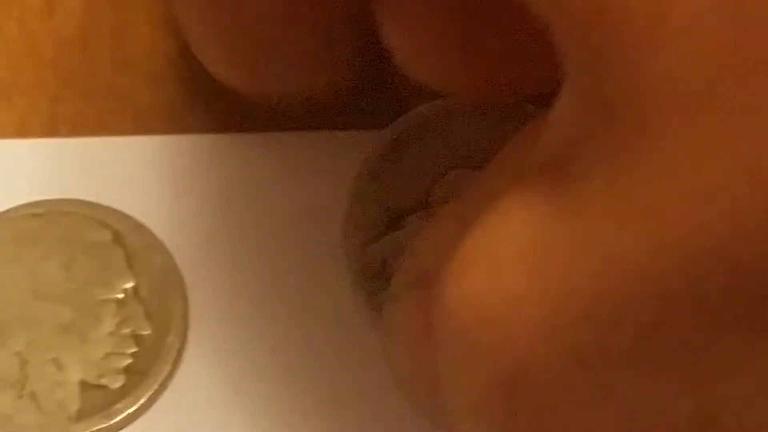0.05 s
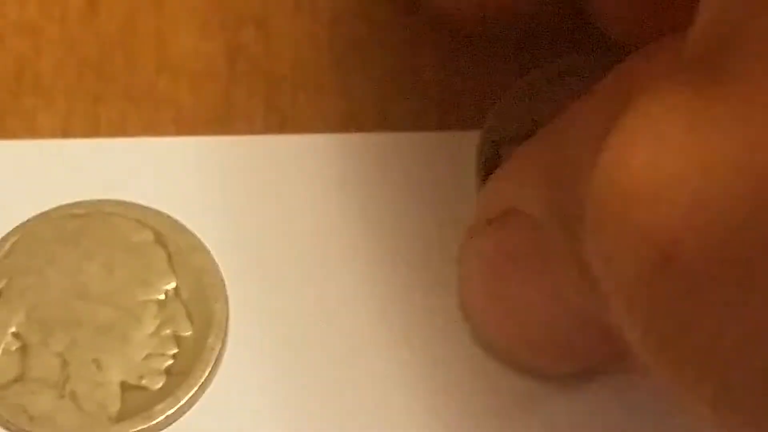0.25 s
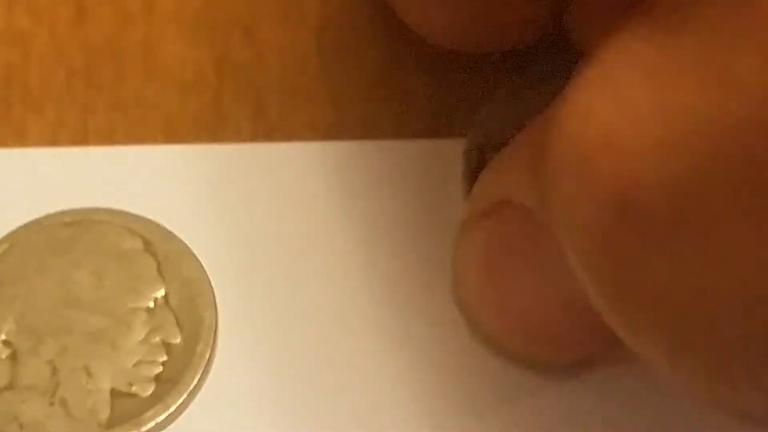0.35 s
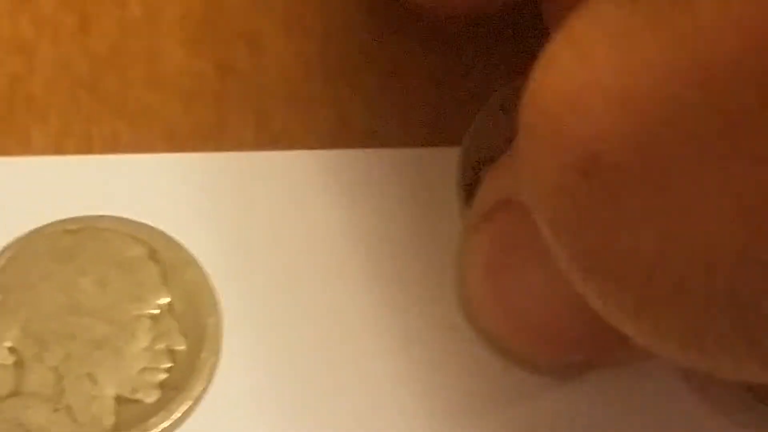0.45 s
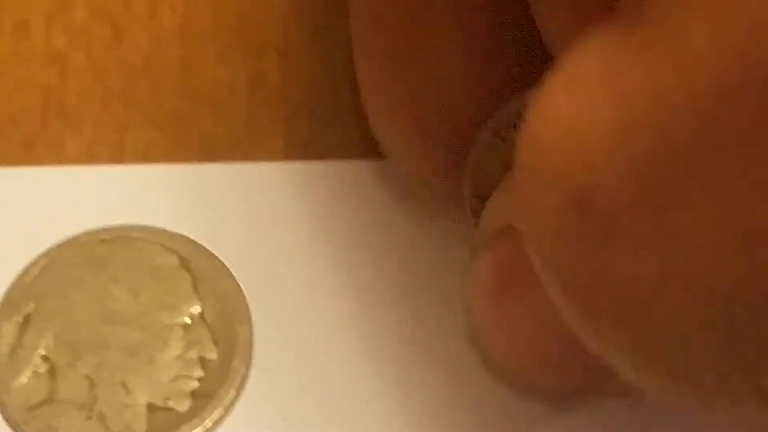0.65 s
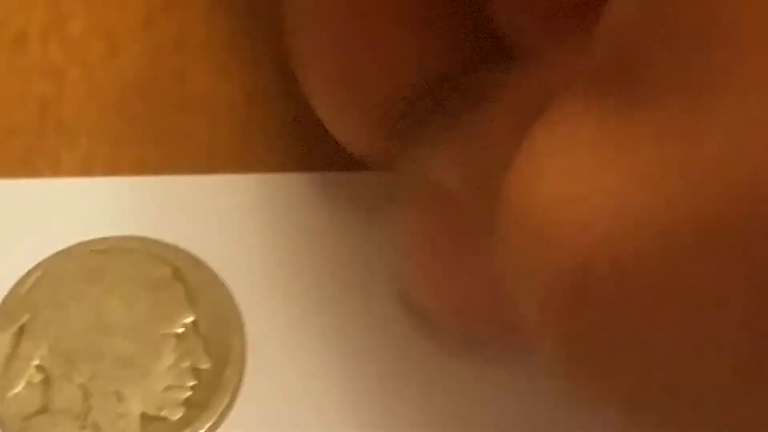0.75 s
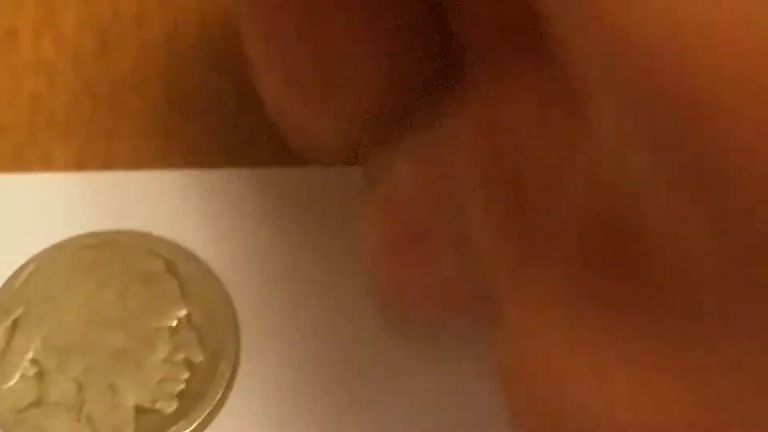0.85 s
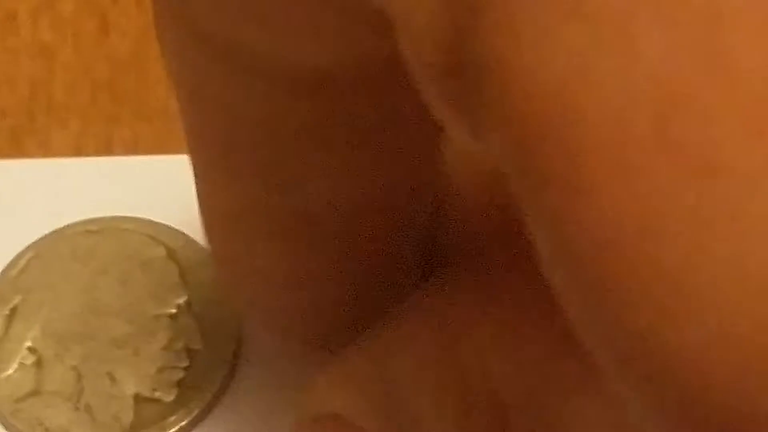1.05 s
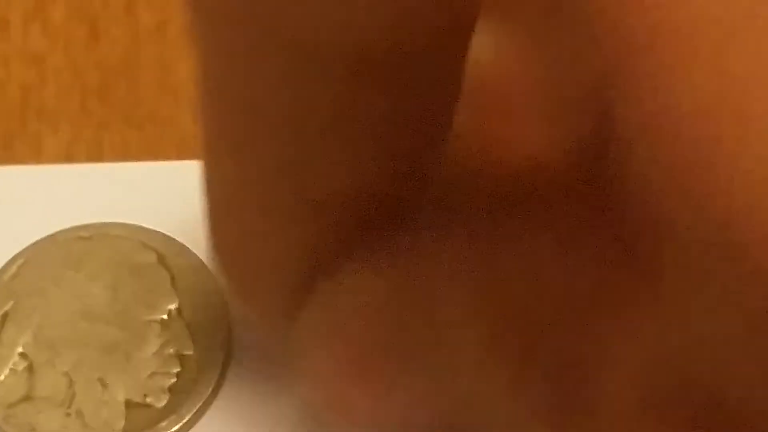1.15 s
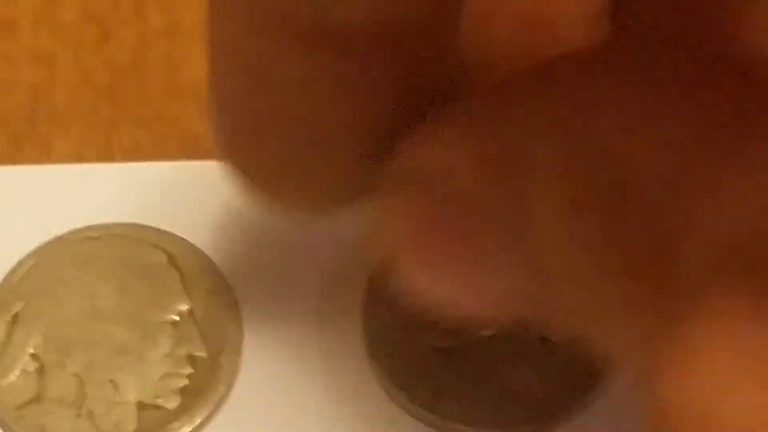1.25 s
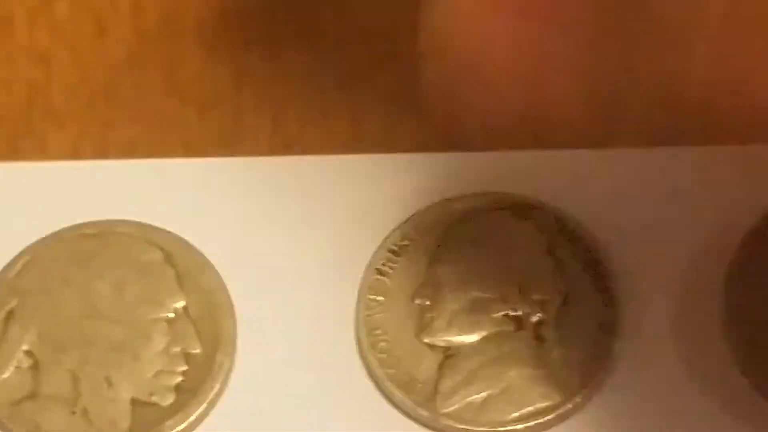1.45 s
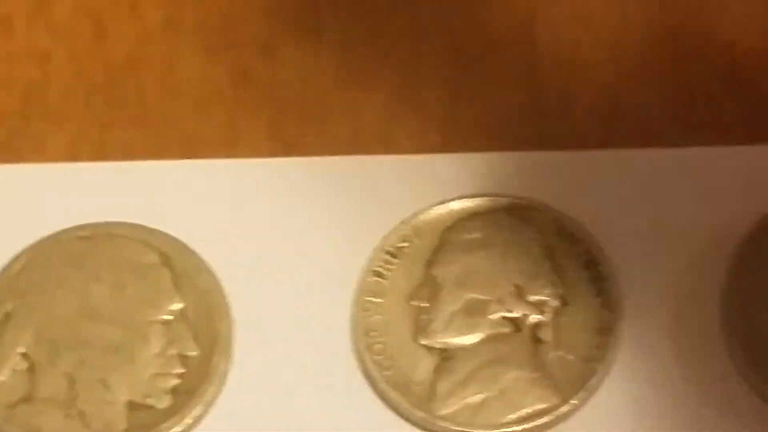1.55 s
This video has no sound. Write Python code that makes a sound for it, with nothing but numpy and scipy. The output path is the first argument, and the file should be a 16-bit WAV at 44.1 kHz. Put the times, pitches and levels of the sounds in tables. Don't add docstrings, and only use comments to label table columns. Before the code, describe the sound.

One crisp coin snap on a papered tabletop, then faint touches and a softer laying-down click

```python
import sys
import numpy as np
from scipy import signal
from scipy.io import wavfile

SR = 44100
rng = np.random.default_rng(int(sys.argv[2]) if len(sys.argv) > 2 else 0)


def ratio(d):
    e = np.asarray(d, float) / 20
    return 10 ** e


def int16_out(signal):
    q = np.round(np.clip(np.atleast_2d(signal).T, -1, 1) * 32767)
    wavfile.write(sys.argv[1], SR, q.astype(np.int16))


N = 70560

# time in seconds, gate level in dB.
GATE = [(0, -62), (0.179, -65), (0.199, -79.5), (.3, -80), (0.401, -82), (.5, -82), (0.651, -85.5),
        (.77, -90), (.95, -94.5), (1.119, -89), (1.201, -83), (1.23, -78), (1.349, -76), (1.45, -74),
        (1.6, -72)]
# frequency in Hz, share of the gate swing (ratio).
GATE_SHARE = [(60, 0.36), (200, 0.73), (600, 1.027), (2300, 0.91), (4200, 1.15), (11000, 1.6)]
# frequency in Hz, density in dB per Hz.
FAN_SPECTRUM = [(30, -21), (120, -14.5), (185, -10), (270, -14.5), (550, -24), (1100, -23), (1650, -38.5),
                (2000, -29.5), (2300, -24), (2800, -32.5), (3200, -41),
                (3500, -49.5), (4250, -27.5), (5000, -41.5), (5600, -43.5), (6100, -70.5), (7000, -80.5),
            (7900, -67.5), (8500, -50.5), (9000, -44), (12000, -44), (14500, -47)]
# frequency in Hz, left minus right in dB.
FAN_PAN = [(340, 0), (550, 8), (1600, 8), (2200, 16), (2800, 13), (3400, 6), (4300, 13), (5500, 6),
           (8600, 14), (14000, 2)]
# frequency in Hz, left-right likeness (0 to 1).
FAN_LIKENESS = [(60, .3), (90, .8), (250, .75), (420, .35), (600, .05), (1000, 0)]
FAN_DB = -52
HISS_DB, HISS_LOW_HZ, HISS_DUCK = -87.5, 2980, 0.41
HUM_HZ, HUM_WIDTH_HZ, HUM_STEADY = 120, 14, 3.2
HUM_DB, HUM_GATE_SHARE, HUM_SIDE_DB = -52, 0.54, -13.5

# time in seconds, level in dB, width in seconds.
BUMPS = [
    (0.028, -47, 0.0052),
    (0.229, -55, 0.0063),
    (0.367, -45, 0.0024),
    (0.449, -59, 0.002),
    (0.551, -52.5, 0.0021),
    (0.6314, -51.5, 0.001),
    (0.956, -60, 0.0045),
    (1.0718, -51.5, .0016),
    (1.392, -49, 0.0031),
]
BUMP_SWING, BUMP_RIGHT = 0.8, 0.16

COIN_HZ = (14445, 13580)
# left dB, right dB, left swell in seconds, right swell in seconds.
COIN = [
    (-18.5, -29, .0031, .002),
    (-29, -25, .002, .0019),
]
# time in seconds, upper mode in dB, lower mode in dB.
RINGS = [
    (.2012, 0, 0),
    (.2235, -34, -13),
    (1.2055, -36, -26),
]

# time in seconds, thud in dB, knock in dB, snap in dB, tick in dB.
TAPS = [
    (.2004, -33.5, -29.5, -31, -27.5),
    (.2228, -51.5, -32.5, -39.5, -34.5),
    (.3097, -74.5, -64.5, -64, -46.5),
    (.3517, -65, -66.5, -97, -82.5),
    (.6297, -66, -73.5, -93, -100),
    (.9906, -73.5, -74, -100, -100),
    (1.2056, -60.5, -50.5, -48, -46.5),
]
TAP_HZ = (150, 700, 950, 2700, 3300, 7300, 8500, 15000)
# frequency in Hz, left minus right in dB.
TAP_PAN = [(170, 8), (700, 4), (1100, 3), (2000, 13), (3000, 10), (4300, 15), (6800, 20), (8600, 30),
           (10900, 13), (14000, 5)]
# frequency in Hz, left-right likeness (0 to 1).
TAP_LIKENESS = [(300, .7), (1000, .3), (1700, 0)]
CRACK_S, CRACK_RISE_S = 0.00052, 0.0003
THUD_CUT_HZ = 110

# frequency in Hz, level in dB, 60 dB decay in
# seconds.
TABLE = [(165, 0, 0.026), (325, -4, 0.049), (500, -5.5, .02), (780, -7.5, .015), (1146, -8.5, .015),
         (1500, -8.5, .012), (1800, -4, 0.0089), (2230, -0.5, 0.021), (2614, -4, .012),
         (4250, -2.5, 0.0049), (5140, -1, .007), (8900, 1, .005), (10750, -1.5, 0.0013),
         (14400, -2.5, .004)]
KNOCK_DB, MODE_SPREAD_DB = 5.5, 1.5
# time in seconds, level in dB, frequency in Hz,
# 60 dB decay in seconds.
SETTLE = [
    (.3517, -46, 1620, .016),
    (.6297, -55, 330, .018),
    (.6299, -62, 720, .012),
    (.9906, -58, 1070, .014),
    (.9908, -62, 750, .014),
    (1.2035, -50, 220, .03),
    (1.2058, -55, 1070, .012),
]

# frequency in Hz, 60 dB decay in seconds.
TAIL_T60 = [(150, 0.4), (1000, 0.24), (4000, .31), (9000, .33), (14000, 0.25)]
# frequency in Hz, density in dB per Hz.
TAIL = [(150, -5), (600, -1.5), (1500, -7.5), (2600, -6.5), (3400, -15), (4300, -8), (6500, -17),
        (8600, -16.5), (11500, -19), (14000, -16)]
# frequency in Hz, left minus right in dB.
TAIL_PAN = [(400, 0), (1100, 2), (2400, 8), (3400, 4), (5400, 7), (6800, 13), (8600, 19), (10900, 8),
            (14000, 0)]
WET_DB = [1.5, -6, -29, 10.5, 0, 4.5, 3.5]
TAIL_DB, BUILD_S = -18.5, 0.004
EARLY_DB, EARLY_T60_S = -20, 0.036

# middle in seconds, length in seconds, level in dB.
RUB = (1.093, 0.032, -63.5)
# frequency in Hz, level in dB.
RUB_COLOUR = [(2000, -27), (4000, 5.5), (6000, -2.5), (7300, -9), (9000, -1), (12000, -21)]


def rms_one(x):
    return x / np.sqrt(np.mean(x ** 2) + 1e-20)


def at_hz(points, hz):
    table_hz, values = np.array(points).T
    return np.interp(np.log(hz), np.log(table_hz), values)


def decay(clicks, t60):
    return signal.lfilter([1], [1, -ratio(-60 / (t60 * SR))], clicks + 1e-18)


def ring(clicks, hz, t60):
    r, w = ratio(-60 / (t60 * SR)), 2 * np.pi * hz / SR
    return signal.lfilter([0, np.sin(w)], [1, -2 * r * np.cos(w), r * r], clicks + 1e-18)


def train(s, gains):
    out = np.zeros(N)
    out[(np.asarray(s) * SR).astype(int)] = gains
    return out


def sides(pan_db):
    share = 1 / (1 + ratio(-pan_db))
    return 2 * np.array([[share], [1 - share]])


def noise_bank(layers, order):
    out = 0
    edges = 25 * 2 ** np.arange(0, 9.3, 1 / 4)
    white = rng.standard_normal((2, 2, N))
    for k, (low, high) in enumerate(zip(edges, edges[1:])):
        hz = np.sqrt(low * high)
        mid, side = white[k % 2]
        pair = 0
        for envelope, alike, pan in layers(hz):
            c = np.clip(at_hz(alike, hz), 0, 0.98)
            stereo = np.sqrt(1 + c) * mid + np.sqrt(1 - c) * side * [[1], [-1]]
            pair = pair + stereo * envelope * sides(at_hz(pan, hz))
        band = signal.butter(order, [low, high], "band", fs=SR, output="sos")
        out = out + signal.sosfilt(band, pair)
    return out


def fan(gate):
    def layers(hz):
        level = at_hz(FAN_SPECTRUM, hz) + at_hz(GATE_SHARE, hz) * gate
        return [(ratio(level), FAN_LIKENESS, FAN_PAN)]
    flat = noise_bank(layers, order=3)
    opening_rms = np.sqrt(np.mean(flat[:, :SR // 6] ** 2))
    return ratio(FAN_DB) * flat / opening_rms


def hum(gate):
    t60 = np.log(1000) / np.pi / HUM_WIDTH_HZ
    noise = rng.standard_normal((2, N + SR))
    mid, side = (rms_one(ring(v, HUM_HZ, t60)[SR:]) for v in noise)
    steady = np.sin(2 * np.pi * HUM_HZ * np.arange(N) / SR)
    mid = rms_one(mid + HUM_STEADY * steady)
    stereo = mid + ratio(HUM_SIDE_DB) * side * np.array([[1], [-1]])
    return ratio(HUM_DB + HUM_GATE_SHARE * gate) * stereo


def hiss(gate):
    high_pass = signal.butter(1, HISS_LOW_HZ, "high", fs=SR, output="sos")
    noise = signal.sosfilt(high_pass, rng.standard_normal((2, N)))
    return ratio(HISS_DB - HISS_DUCK * (gate + 29.5)) * noise


def room_noise():
    gate = np.interp(np.arange(N) / SR, *np.transpose(GATE)) - GATE[0][1]
    return fan(gate) + hum(gate) + hiss(gate)


def handling():
    t, out = np.arange(N) / SR, np.zeros(N)
    for s, db, width_s in BUMPS:
        x = (t - s) / width_s
        out -= ratio(db) * (1 - BUMP_SWING * x ** 2) * np.exp(-0.5 * x ** 2)
    return out * np.array([[1], [BUMP_RIGHT]])


def coin():
    t, out = np.arange(N) / SR, np.zeros((2, N))
    for k, (hz, (left_db, right_db, *swell_s)) in enumerate(zip(COIN_HZ, COIN)):
        wave = np.sin(2 * np.pi * hz * t + np.array([[0], [2.1]]))
        for s, *db in RINGS:
            age = np.maximum(t - s, 0) / np.array(swell_s)[:, None]
            level = ratio(db[k] + np.array([[left_db], [right_db]]))
            out += 2 * level * age ** 2 * np.exp(-age) * wave
    return out


def tap_db(hz):
    return np.array([at_hz(list(zip(TAP_HZ, np.repeat(row[1:], 2))), hz) for row in TAPS])


def knock(s, gains, hz, t60):
    soft = signal.butter(2, hz * 1.5, fs=SR, output="sos")
    return sides(at_hz(TAP_PAN, hz)) * signal.sosfilt(soft, ring(train(s, gains), hz, t60))


def table_top():
    s, out = np.transpose(TAPS)[0], 0
    chance = MODE_SPREAD_DB * rng.standard_normal((len(s), len(TABLE)))
    for k, (hz, db, t60) in enumerate(TABLE):
        gains = ratio(tap_db(hz) + db + KNOCK_DB + chance[:, k]) * (-1) ** k
        out = out + knock(s, gains, hz, t60)
    for at, db, hz, t60 in SETTLE:
        out = out + knock([at], ratio(db), hz, t60)
    return out


def crack_and_room():
    s = np.transpose(TAPS)[0]
    middle_s, length_s, rub_db = RUB
    rub = np.cos(np.pi * np.clip((np.arange(N) / SR - middle_s) / length_s, -0.5, 0.5))

    def layers(hz):
        g = ratio(tap_db(hz))
        crack = decay(decay(train(s, g), 7 * CRACK_S), 7 * CRACK_RISE_S)
        crack = np.sqrt(SR / hz) * crack * 2 / (CRACK_RISE_S * SR)
        clicks = train(s, g * ratio(np.array(WET_DB))) * ratio(at_hz(TAIL, hz) + 19.5)
        tail = ratio(TAIL_DB) * decay(clicks, at_hz(TAIL_T60, hz))
        tail = tail + ratio(EARLY_DB) * decay(clicks, EARLY_T60_S)
        tail = decay(tail, 7 * BUILD_S) / (BUILD_S * SR)
        tail = tail + ratio(rub_db - 16.5 + at_hz(RUB_COLOUR, hz)) * rub
        return (crack, TAP_LIKENESS, TAP_PAN), (tail, TAP_LIKENESS, TAIL_PAN)
    return noise_bank(layers, order=2)


def contacts():
    high_pass = signal.butter(3, THUD_CUT_HZ, "high", fs=SR, output="sos")
    return signal.sosfilt(high_pass, crack_and_room() + table_top())


def scene():
    return room_noise() + handling() + coin() + contacts()


def roll_off(x):
    return signal.sosfilt(signal.butter(12, 15800, fs=SR, output="sos"), x)


def record(dry):
    low_pass = signal.cheby2(10, 50, 15550, fs=SR, output="sos")
    return roll_off(signal.sosfilt(low_pass, dry))


dry = scene()
out = record(dry)
int16_out(out)
```